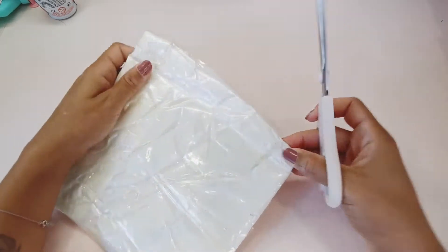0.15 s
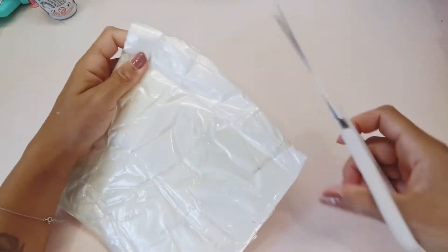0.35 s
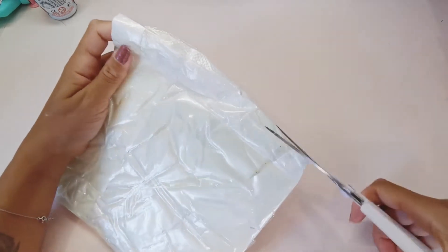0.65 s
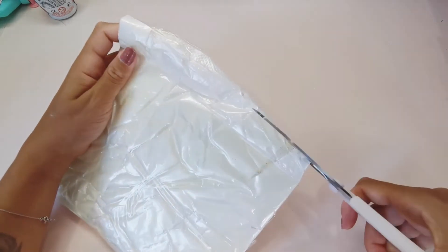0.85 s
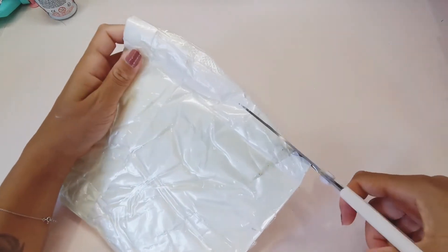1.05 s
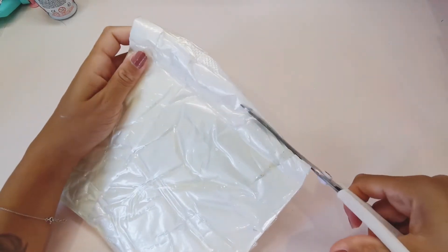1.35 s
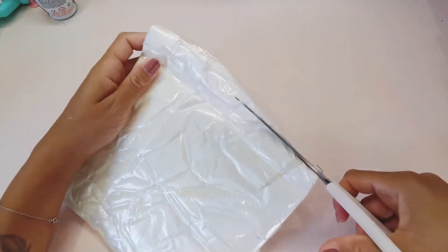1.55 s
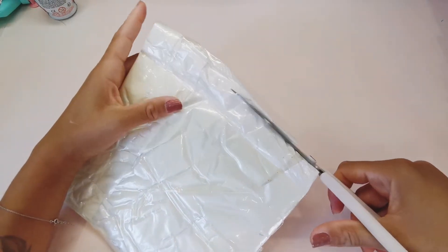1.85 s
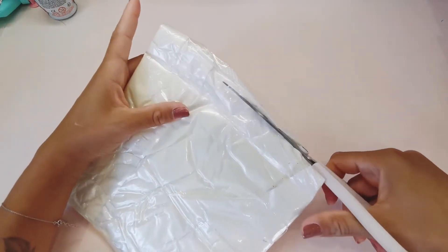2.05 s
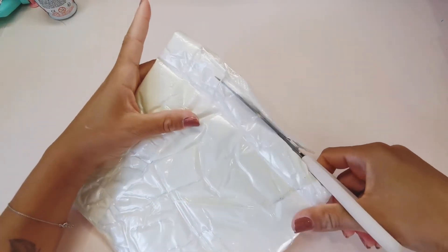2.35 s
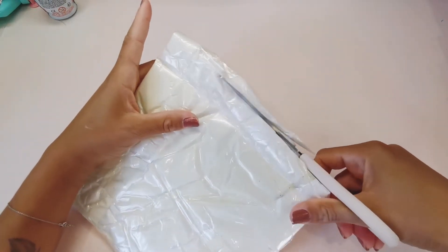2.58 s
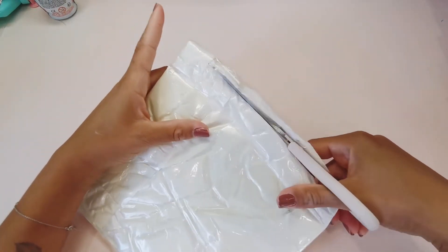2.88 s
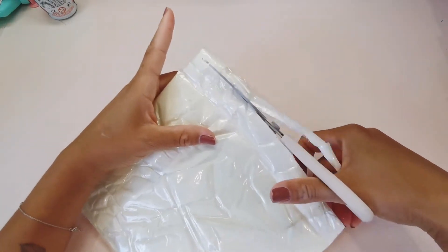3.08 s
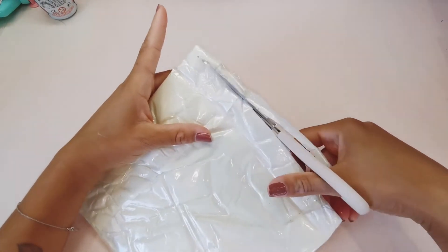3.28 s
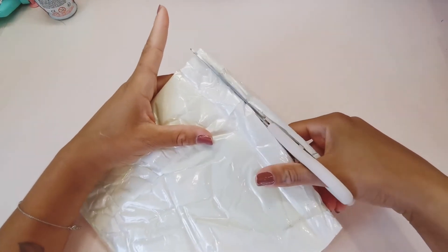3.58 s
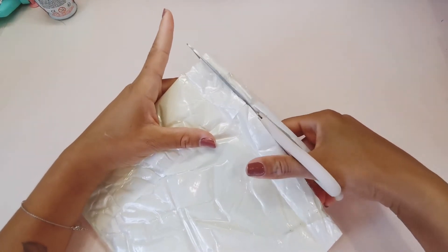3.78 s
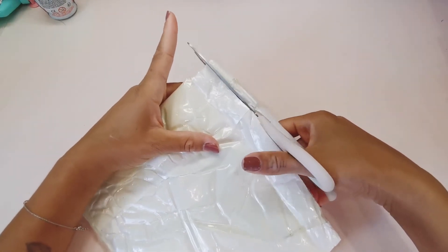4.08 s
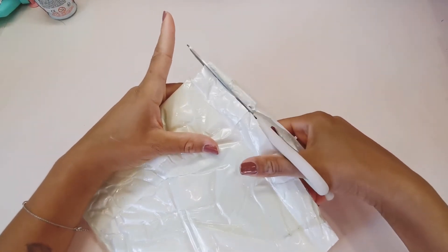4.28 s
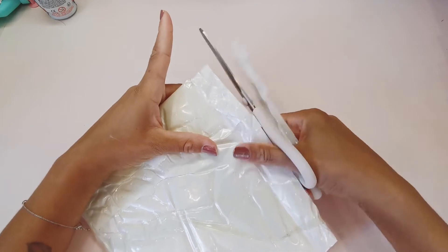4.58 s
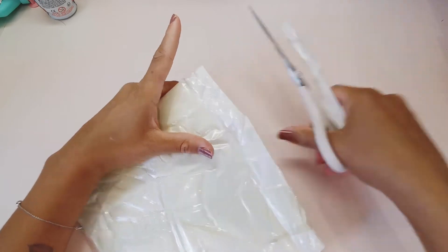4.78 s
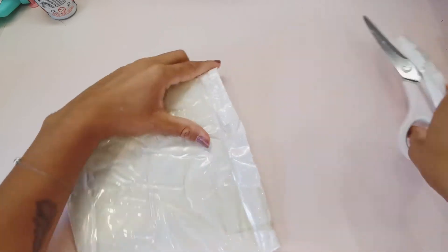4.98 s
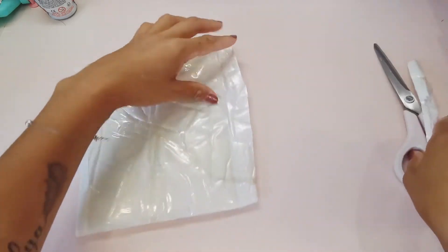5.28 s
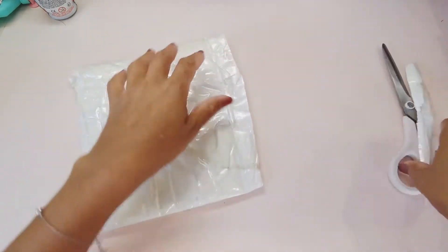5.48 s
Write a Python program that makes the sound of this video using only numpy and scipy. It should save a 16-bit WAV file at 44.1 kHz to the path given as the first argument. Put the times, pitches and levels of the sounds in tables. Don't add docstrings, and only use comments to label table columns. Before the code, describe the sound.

A stiff plastic pouch is handled and cut with scissors at close range, slightly louder on the left. Crisp crease snaps and fine crackle ride on breathy swells of rustling film, with a hollow papery boom beneath. After the sharpest snip comes a shifting slide, then a woody double knock as the handles land, over faint room murmur.

```python
import sys
import numpy as np
from scipy import signal
from scipy.fft import rfft, irfft
from scipy.io import wavfile
from scipy.ndimage import uniform_filter1d

SR = 44100
rng = np.random.default_rng(int(sys.argv[2]) if len(sys.argv) > 2 else 0)


def to_wav(sig):
    pcm = np.clip(np.atleast_2d(sig), -1, 1) * 32767
    pcm = np.round(pcm).astype(np.int16)
    wavfile.write(sys.argv[1], SR, pcm.T)


def magnitude_from_level(level_db):
    exponent = np.asarray(level_db, float) / 20
    return 10 ** exponent


N = 248724

# pitch in Hz, level in dB per Hz.
ROOM_SPECTRUM = [(15, -35), (25, 5), (53, -7), (72, -5), (145, -11), (236, -24.5), (309, -13.5),
                 (451, -20.5), (591, -29), (641, -23.5), (1290, -34), (1400, -25), (16000, -58)]
ROOM_DB = -61.5
# pitch in Hz, likeness from 0 to 1.
LIKENESS = [(60, 0.91), (180, 0.82), (550, 0.68), (1650, 0.08), (4970, 0.24), (15000, 0.38)]
# pitch in Hz, difference in dB.
LEFT_RIGHT = [(60, -34), (180, -1.5), (550, 4), (1650, 4), (4970, 1.5), (15000, 6.5)]

# start in seconds, peak in dB, pitch in Hz, 60 dB decay in seconds.
BUMPS = [(0.028, -54, 217.5, 0.1), (0.057, -52.5, 92.5, 0.085), (0.086, -55, 45.8, 0.051),
         (0.147, -63, 75.4, 0.12), (0.758, -58, 140, 0.065), (1.197, -58, 189, 0.032),
         (1.601, -57, 158, 0.069), (2.138, -59, 117, 0.036), (2.528, -51, 136, 0.07),
         (2.568, -49.5, 193, 0.042), (2.748, -62.5, 203, 0.19), (3.15, -62, 220, 0.032),
         (4.289, -50.5, 70, 0.14), (4.447, -58, 50, 0.14), (4.611, -52.5, 72, 0.15),
         (4.824, -56.5, 47, 0.14), (4.86, -57, 125, 0.059), (4.976, -62, 108, 0.11),
         (5.298, -46, 70, 0.044), (5.313, -41.5, 70, 0.044), (5.36, -51, 62, 0.1),
         (5.538, -57.5, 168, 0.08)]
# start in seconds, peak in dB.
KNOCKS = [
    (5.289, -24.5),
    (5.297, -49),
    (5.317, -37.5),
    (5.331, -30),
    (5.359, -47),
]
# pitch in Hz, level in dB, 60 dB decay in seconds.
WOOD_RINGS = [(386, -2, 0.055), (500, -5.5, 0.033), (861, 0.5, 0.016), (2180, -32, 0.024)]

# pitch in Hz, level in dB, 60 dB decay in seconds.
STEEL_RINGS = [(1632, 3.5, 0.014), (3940, -6, .02), (5010, -1.5, 0.027), (5700, -5.5, .03),
               (6710, -4.5, 0.026), (8700, -17, 0.009)]
# start in seconds, peak in dB, extra dB of the lowest ring.
CLINKS = [(4.6305, -29, -12), (4.6443, -22.5, -1.5), (4.6462, -28.5, 0), (4.3712, -31.5, -12),
          (4.9945, -43.5, 17), (5.289, -35.5, -5), (5.3138, -37, -17), (5.3275, -35, -24),
          (5.3562, -44, -22), (5.372, -46, -20), (5.533, -42, -31)]

# pitch in Hz, level in dB per Hz.
FILM_SPECTRUM = [(880, -26.5), (1500, -2), (2220, 2.5), (2470, 3.5), (3250, 1), (5210, 1), (7630, -2),
                 (9100, 1), (13000, -4), (15600, -10.5)]
# pitch in Hz, width in Hz, level in dB.
BLADE_RINGS = [(2260, 470, -18), (5180, 310, -1), (6790, 560, 2), (8300, 200, -18), (10760, 130, 0)]
# pitch in Hz, width in Hz, level in dB.
POUCH_BOOMS = [(370, 75, -9.5), (610, 91, -13.5), (777.6, 46, -2.5), (940, 290, -10.5)]
# pitch in Hz, width in Hz.
BLADE_RUB = (1544, 1140)

# peak in seconds, rise in seconds, fall in seconds, rustle in dB, pouch boom in dB against it.
SLICES = [(1.391, 0.095, 0.12, -46, -10), (1.808, 0.15, 0.089, -49.5, -7), (2.19, 0.073, 0.089, -48, -6.5),
          (2.341, 0.011, 0.22, -55, -17), (2.419, 0.13, 0.056, -52.5, -3), (2.542, 0.043, 0.16, -46, -3.5),
          (2.768, 0.14, 0.078, -46.5, -6), (3.072, 0.036, 0.053, -47.5, -13),
          (3.15, 0.14, 0.042, -49.5, -12.5), (3.451, 0.069, .2, -52.5, -11),
          (3.591, 0.08, 0.11, -51.5, -4.5), (3.809, 0.11, 0.062, -53, -0.5), (4.149, 0.088, 0.094, -51, -4),
          (4.358, 0.18, 0.033, -53, -8.5), (4.64, 0.041, 0.11, -44, -8.5)]
PUSHES = [(1.539, 0.049, 0.41, -56, -11.5), (1.64, 0.05, 0.086, -52, 0.5), (1.72, 0.028, 0.087, -51.5, -10),
          (1.972, 0.04, 0.53, -55, -4.5), (2.7, 0.084, 0.12, -50, -5.5), (2.943, 0.12, 0.086, -48.5, -7.5),
          (3.298, 0.18, 0.096, -52, -5.5), (3.751, 0.043, .12, -56, -17),
          (3.911, 0.057, 0.15, -49.5, -16.5), (4.52, 0.097, 0.23, -57, -12)]
GRIPS = [(.05, 0.089, 0.27, -58, -8.5), (0.183, 0.059, 0.23, -48.5, -2), (.43, 0.031, 0.12, -56.5, -14),
         (.64, 0.53, 0.14, -68.5, 3), (.78, 0.13, 0.037, -63.5, 5), (1.06, 0.17, 0.56, -66.5, -14),
         (1.21, 0.12, 0.18, -60.5, -1.5), (4.799, 0.076, 0.26, -51, -0.5), (4.868, 0.15, 0.075, -52, 12.5),
         (0.332, 0.053, 0.11, -52, 1)]
SLIDES = [
    (4.93, 0.072, 0.93, -56, -25),
    (5.2, 1, 0.073, -57, -16),
    (5.279, 0.046, 0.11, -50.5, -7),
    (5.358, 0.093, 0.11, -60, -22),
    (5.53, 0.029, 0.054, -71, -17.5),
]
BRIGHT_DB = [0.047, -1.5, -2.6, -1.5, -0.61]
RUB_DB = [-4.5, -3, -42, -2]
BOOM_DB = [-8, 3.5]
REST_DB = -81
RISE_BULGE, FALL_BULGE = 0.85, 0.92

# start in seconds, peak in dB, ring in dB against the snap, brightness in dB.
CUSHION_SNAPS = [(.262, -29.5, -7.5, -10), (0.3051, -27, -10, 0), (.4209, -39, -16, 8),
                 (1.002, -32.5, -24, -13), (1.0784, -31.5, -19, -8.5), (1.1963, -25, -7.5, -9),
                 (1.237, -43.5, -21, -24), (1.3787, -26, -26, 0), (1.4444, -31.5, -16.5, -23),
                 (1.6707, -30.5, -23, -2), (1.706, -46, 1, -20.5), (1.8192, -34.5, -20, -1),
                 (1.9627, -35, -13, -3), (2.1786, -52, -19, 22), (2.2006, -30, -8, 2), (2.328, -47, -3, 13),
                 (2.4192, -36.5, -10, 7.5), (2.5235, -34.5, 0.5, 5.5), (2.5453, -27.5, -18, -1.5),
                 (2.6279, -24.5, -14.5, -8), (2.7734, -41, -9, -6), (3.2103, -47, -28, 11.5),
                 (3.281, -26.5, -15.5, -2.5), (3.3216, -25, -23.5, -28), (3.8666, -34.5, -18.5, -4),
                 (3.9267, -27.5, -23.5, -22), (4.0796, -50.5, -3, 6), (4.2937, -34, -15, -3),
                 (4.7789, -40, -3, -14), (4.8135, -40, -7.5, -8)]
LONG_SNAPS = [(.623, -45.5, -12.5, 0), (0.8017, -51, -15, 3), (1.131, -36, -24, -28),
              (1.2185, -35, -29, -12), (1.551, -36.5, -12, -20), (1.7874, -24, -23, -5.5),
              (2.8855, -47.5, -6, 7), (2.9307, -26.5, -19, -1), (2.95, -31, -3, -2),
              (3.02, -27.5, -17.5, 0), (3.0787, -27, -19, -3.5), (3.1533, -39.5, -10.5, -17),
              (2.679, -41.5, -3.5, -8), (4.6448, -33.5, -6.5, 7), (5.2875, -27, -25, -7),
              (5.3132, -29, -21, -13)]
MIDDLE_SNAPS = [(0.0643, -32, -25, -10), (.0907, -31.5, -23, -10), (0.1465, -46, -8, -13),
                (.167, -34, -3, -6), (.187, -25, -32, -19), (.216, -40, -18, -28), (.637, -52.5, -30, 17),
                (.7183, -60, 1, -13), (.7457, -57, -3, -13), (0.7632, -42, -3.5, 6), (1.3392, -31, -27, -8),
                (2.1506, -49, -21, -27), (3.5398, -36, -16, 6), (3.5676, -32, -15.5, 8.5),
                (3.738, -51.5, -22, 12.5), (4.133, -26.5, -14.5, -7), (.277, -27.5, -37, -25),
                (4.994, -29, -11, -3.5), (5.014, -40.5, -2.5, -3), (5.0575, -45, -6, -10),
                (4.4832, -55, -24, 15)]
SHORT_SNAPS = [(0.0309, -34, -18, -6), (0.2297, -28, -18, -1), (0.388, -32, -18, -2),
               (0.5524, -50.5, 2.5, -20), (1.302, -33.5, -25, -5.5), (1.318, -33.5, -27, -5),
               (1.5273, -43.5, -24, 4), (1.6089, -31, -10.5, 2), (2.7027, -43, -19, 11),
               (2.7402, -28, -12.5, -7), (2.799, -27.5, -17, -22), (3.053, -44, -6, 5),
               (3.1317, -26, -14.5, 0), (3.4423, -39.5, -13, 8), (3.607, -31, -21, -3),
               (3.727, -49, -12, 6), (3.893, -32, -21, -9), (4.2722, -50, -3, -8), (4.345, -32, -15, 7),
               (4.37, -34, -13.5, 1.5), (4.631, -30, -12, 3), (4.8313, -38.5, -6, 5.5),
               (5.523, -40, -24, -3)]
TIGHT_SNAPS = [(.858, -50, -25, -27), (0.891, -46, -21, -22), (1.26, -45, -25, 0.5), (1.46, -38, -9, -17),
               (2.4797, -38.5, -25, -8), (3.631, -36.5, -10.5, 1), (3.653, -44, -4.5, 6),
               (4.4514, -58, -28, 9.5), (4.6455, -30, -26, 6), (4.6464, -25, -14, 2),
               (4.932, -33, -23, -12), (5.143, -45.5, -3, 7), (5.329, -48, -15, -14), (5.533, -40, -25, -9)]
SLACK_SNAPS = [(.0405, -41, -20, -9), (.099, -42.5, -8, -15), (.12, -41, -22, -8),
               (.1805, -33.5, -0.5, -12), (2.591, -41, -1, -10), (2.615, -40, -8, -14),
               (2.944, -32, -14, 0), (2.984, -41, -7.5, -12), (5.049, -45.5, -7.5, -10)]
# pitch in Hz, 60 dB decay in seconds.
FOLD_RINGS = [
    (772, 0.11),
    (598, 0.095),
    (955, 0.13),
    (1570, 0.13),
    (1580, 0.037),
    (860, 0.047),
]
# time of the peak in seconds, peak in dB, pitch in Hz.
EARLY_POPS = [(0.0393, -30, 3000), (0.0646, -27, 4140), (0.0908, -25.5, 3780), (0.1482, -26, 4000),
              (0.168, -21.5, 1600), (0.1923, -16, 3600), (0.2326, -19.5, 2700), (0.2631, -21, 1300),
              (0.2775, -16.5, 2230), (0.3073, -14, 4700), (0.3201, -26, 4800), (0.3887, -19, 6030),
              (0.4212, -15, 7800), (0.4343, -26, 5900), (0.5529, -30, 1670), (0.6383, -28, 8400),
              (0.7636, -23, 7300), (0.8031, -32.5, 6400), (1.0037, -28, 3500), (1.08, -28, 4400),
              (1.132, -31, 2920), (1.1977, -13.5, 1940), (1.2192, -28, 2700), (1.2391, -27.5, 3900),
              (1.2612, -30, 7100), (1.3037, -25, 3680), (1.3193, -31, 5600), (1.3534, -27, 4300),
              (1.387, -17, 3800), (1.4174, -23, 5600), (1.4451, -23, 2400), (1.5396, -29, 3400),
              (1.553, -27, 3800), (1.6094, -18, 3000), (1.6442, -25, 3400), (1.67, -27, 6900),
              (1.7294, -24, 6800), (1.7877, -17, 4400), (1.8235, -19.5, 5700), (1.8463, -28, 3700),
              (1.9637, -26, 3800), (1.9849, -26, 5600), (1.989, -26, 6900), (2.0789, -31.5, 6300),
              (2.1569, -31, 8000), (2.1665, -27, 7130), (2.1835, -23, 7100), (2.1866, -23, 8200),
              (2.2023, -18, 3600), (2.3296, -33, 8500), (2.4032, -35, 5250), (2.4223, -25, 4570),
              (2.5475, -15, 5100)]
LATE_POPS = [(2.6136, -28, 2300), (2.6295, -13, 3180), (2.7023, -24, 4700), (2.7178, -25, 5800),
             (2.7414, -16, 3430), (2.801, -23, 3000), (2.9309, -16.5, 4400), (2.9504, -21, 2800),
             (2.9839, -27.5, 2000), (3.0214, -15, 6000), (3.0539, -24, 7200), (3.0789, -18, 6000),
             (3.1068, -26, 5900), (3.1331, -16.5, 4470), (3.1551, -25, 2590), (3.2117, -18.5, 7500),
             (3.2829, -25, 5200), (3.2971, -27, 5000), (3.3222, -21, 3100), (3.3289, -25, 3200),
             (3.4443, -36, 6300), (3.4792, -28, 6700), (3.5405, -14.5, 8700), (3.5694, -20, 9000),
             (3.632, -32, 4100), (3.6524, -30, 4500), (3.7395, -27, 7000), (3.7553, -34, 6000),
             (3.7628, -29, 5400), (3.8677, -23, 6400), (3.8913, -25, 3300), (3.9527, -26.5, 3200),
             (4.1193, -28, 5500), (4.1334, -16.5, 7600), (4.297, -25, 4600), (4.3131, -25, 5800),
             (4.3475, -16.5, 6600), (4.3713, -15.5, 5540), (4.4517, -34, 5800), (4.4846, -37, 6800),
             (4.6312, -21, 5500), (4.6466, -9, 3870), (4.6984, -26, 5260), (4.7909, -28, 2600),
             (4.8152, -24, 4100), (4.9322, -30, 4400), (4.9947, -26, 1720), (4.9987, -17.5, 3400),
             (5.1405, -30, 4400), (5.1567, -31.5, 2390), (5.2663, -30, 3400), (5.288, -17, 5700),
             (5.3142, -21, 4370), (5.328, -25, 5500), (5.3556, -27, 5800), (5.5235, -31, 3700),
             (5.5334, -26, 5800)]


def evened(x):
    return x / np.sqrt(np.mean(x ** 2) + 1e-20)


def read(points, hz):
    f, value = np.transpose(points)
    return np.interp(np.log(hz + 1), np.log(f + 1), value)


def add(mix, s, sound):
    part = mix[max(round(s * SR), 0):][:len(sound)]
    part += sound[:len(part)]


def resonate(x, hz, width):
    r = np.exp(-np.pi * width / SR)
    return 2 * signal.lfilter([1 - r], [1, -r * np.exp(2j * np.pi * hz / SR)], x).real


def coloured(x, db):
    both_sides = np.r_[db, db[-2:0:-1]]
    log_gain = np.log(magnitude_from_level(np.maximum(both_sides, -100)))
    taps = np.fft.ifft(np.exp(np.conj(signal.hilbert(log_gain)))).real
    return signal.oaconvolve(x, taps[:1024])[:len(x)]


def split(x, hz):
    low = signal.butter(3, hz, fs=SR, output="sos")
    high = signal.butter(3, hz, "high", fs=SR, output="sos")
    return signal.sosfilt(low, x), signal.sosfilt(high, x)


def room_tone():
    frames, hz = N // 512 + 5, np.fft.rfftfreq(2048, 1 / SR)
    a, b, c, d, patches = rng.standard_normal((frames, 1025, 5)).T
    patches = uniform_filter1d(patches, 20, 0)
    patches = evened(uniform_filter1d(patches, 8, 1))
    same = read(LIKENESS, hz)[:, None]
    left = a + 1j * b
    right = same * left + np.sqrt(1 - same ** 2) * (c + 1j * d)
    spectrum = np.array([left, right]) * magnitude_from_level(read(ROOM_SPECTRUM, hz)[:, None] + 1.3 * patches)
    murmur = signal.istft(spectrum, nperseg=2048, noverlap=1536)[1][:, :N]
    return magnitude_from_level(ROOM_DB) * evened(murmur)


def reflections(x, t60, start_s):
    t = np.arange(round(t60 * SR)) / SR
    signs = rng.choice([-1., 1.], (2, len(t)))
    taps = signs * (rng.random((2, len(t))) < 5000 / SR) * (t > start_s)
    low, high = split(taps, 2060)
    taps = 0.5 * low * magnitude_from_level(-60 * t / (1.12 * t60)) + high * magnitude_from_level(-60 * t / t60)
    return signal.oaconvolve(x[None], taps / np.linalg.norm(taps[0]), axes=1)[:, :N]


def table():
    t, out = np.arange(9000) / SR, np.zeros(N)
    soft_start = 1 - np.exp(-t / 0.00067)
    for s, db, hz, t60 in BUMPS:
        add(out, s, magnitude_from_level(db + 12.0 - 60 * t / t60) * soft_start * np.sin(2 * np.pi * hz * t))
    rise = 1 - np.exp(-t / 0.0009)
    detune = rng.uniform(0.9, 1.04, (len(KNOCKS), len(WOOD_RINGS)))
    for (s, db), shifts in zip(KNOCKS, detune):
        for (hz, ring_db, t60), shift in zip(WOOD_RINGS, shifts):
            wave = np.sin(2 * np.pi * hz * shift * t)
            add(out, s, magnitude_from_level(db + ring_db - 60 * t / t60) * rise * wave)
    return out


def clinks():
    t, out = np.arange(3000) / SR, np.zeros(N)
    rise = np.minimum(t / 0.00039, 1)
    for s, db, low_db in CLINKS:
        for hz, ring_db, t60 in STEEL_RINGS:
            level_db = db + ring_db + low_db * (hz < 2500) - 60 * t / t60
            add(out, s, magnitude_from_level(level_db) * rise * np.sin(2 * np.pi * hz * t))
    return out


def strokes(power=0.56):
    t = np.arange(0, N + 64, 32) / SR
    rows = [(*r, RUB_DB[0], BRIGHT_DB[0]) for r in SLICES]
    rows += [(*r, RUB_DB[1], BRIGHT_DB[1]) for r in PUSHES]
    rows += [(*r[:4], BOOM_DB[0], r[4], BRIGHT_DB[2]) for r in GRIPS]
    rows += [(*r, RUB_DB[3], BRIGHT_DB[4]) for r in SLIDES]
    s, rise, fall, db, *colours = np.transpose(rows)[:, :, None]
    swell = (1 + (t - s) / rise).clip(0) ** RISE_BULGE
    sink = (1 - (t - s) / fall).clip(0) ** FALL_BULGE
    rest = magnitude_from_level(power * REST_DB)
    gains = (rest + np.minimum(swell, sink) * (magnitude_from_level(power * db) - rest)) ** (1 / power)
    share, still = (gains - magnitude_from_level(REST_DB)) ** 2, magnitude_from_level(REST_DB) ** 2
    at_rest = BOOM_DB[1], RUB_DB[2], BRIGHT_DB[3]
    mixed = [((share * c).sum(0) + still * r) / (share.sum(0) + still) for c, r in zip(colours, at_rest)]
    return [gains.max(0), *mixed], t


def stroke(column):
    rows, t = strokes()
    return np.interp(np.arange(N) / SR, t, rows[column - 1])


def effort():
    return stroke(column=1)


def film(x, ring_db=-2):
    x = coloured(x, read(FILM_SPECTRUM, np.fft.rfftfreq(2048, 1 / SR)))
    rings = sum(magnitude_from_level(db) * resonate(x, hz, width) for hz, width, db in BLADE_RINGS)
    return x + magnitude_from_level(ring_db) * rings


def pops(rise_cycles=0.26, fall_cycles=0.33):
    t, out = np.arange(-64, 192) / SR, np.zeros(N)
    for s, db, hz in list(EARLY_POPS) + list(LATE_POPS):
        turns = hz * t
        before = np.exp(-(turns / rise_cycles) ** 2)
        after = np.exp(-abs(turns) / fall_cycles)
        shape = np.where(t < 0, before, after)
        add(out, s + t[0], -magnitude_from_level(db) * shape * np.cos(2 * np.pi * turns))
    return out


def ticks(per_s, spread_db, count):
    size = magnitude_from_level(spread_db * np.minimum(rng.exponential(1, N), 4)) * (rng.random(N) < per_s / SR)
    kind, t, out = rng.integers(0, count, N), np.arange(300) / SR, np.zeros(N)
    for k, hz in enumerate(np.geomspace(750, 13000, count)):
        grain = np.sin(2 * np.pi * hz * t) * np.exp(-t * (1.3 * hz + 500))
        out += signal.oaconvolve(size * (kind == k), evened(grain) * (hz / 4000) ** 0.04)[:N]
    return effort() * evened(out)


def snaps():
    t = np.arange(3000) / SR
    dull, bright, boom = np.zeros((3, N))
    tables = CUSHION_SNAPS, LONG_SNAPS, MIDDLE_SNAPS, SHORT_SNAPS, TIGHT_SNAPS, SLACK_SNAPS
    flips = [(*row, *fold) for rows, fold in zip(tables, FOLD_RINGS) for row in rows]
    chance = rng.standard_normal((len(flips), 2, len(t)))
    for (s, db, boom_db, bright_db, hz, t60), (noise, lumps) in zip(flips, chance):
        shape = np.minimum(t / 0.0001, 1) * magnitude_from_level(-60 * t / t60)
        lumpy = magnitude_from_level(4 * evened(uniform_filter1d(lumps, 24)))
        burst = noise * shape * (lumpy + 3.5 * magnitude_from_level(-60 * t / 0.015))
        burst = burst / np.sqrt(abs(uniform_filter1d(burst ** 2, 60)).max())
        add(dull, s, magnitude_from_level(db) * burst)
        add(bright, s, magnitude_from_level(db + bright_db) * burst)
        push = burst * magnitude_from_level(-60 * t / 0.13)
        ring = resonate(resonate(push, hz, 0.3 * hz), hz, 1.8 * hz)
        add(boom, s, magnitude_from_level(db + boom_db) * ring / abs(ring).max())
    low, high = (np.std(part) for part in split(film(rng.standard_normal(N)), 8000))
    body = split(film(dull), 4700)[0]
    top = split(film(bright), 4700)[1]
    return magnitude_from_level(-6.5) * body / low + magnitude_from_level(-8.5) * top / high + magnitude_from_level(8.5) * boom


def crackle(per_s, spread_db, t60):
    size = magnitude_from_level(spread_db * np.minimum(rng.exponential(1, N), 3)) * (rng.random(N) < per_s / SR)
    fall = magnitude_from_level(-60 / t60 / SR)
    return evened(np.sqrt(signal.lfilter([1], [1, -fall ** 2], size ** 2)))


def rustle(bursts):
    creases = bursts * rng.standard_normal(N)
    dull, bright = split(film(creases), 5840)
    hiss = evened(dull) + magnitude_from_level(stroke(column=4) + 1.0) * evened(bright)
    rub = evened(resonate(resonate(creases, *BLADE_RUB), *BLADE_RUB))
    boom = evened(sum(magnitude_from_level(db) * resonate(creases, hz, width) for hz, width, db in POUCH_BOOMS))
    return effort() * (hiss + magnitude_from_level(stroke(column=2) + 3.5) * boom + magnitude_from_level(stroke(column=3) - 0.5) * rub)


def spots(x, lag=5.06, lag_spread=2.4, fade_hz=5500, near_db=0.5):
    hop, size = 192, 1024
    starts = np.arange(0, N + hop, hop)
    padded = np.r_[np.zeros(hop), x, np.zeros(2 * hop)]
    window = np.sin(np.pi * np.arange(2 * hop) / (2 * hop))
    pieces = padded[starts[:, None] + np.arange(2 * hop)] * window
    hz, t = np.fft.rfftfreq(size, 1 / SR), np.arange(3 * hop) / SR
    taps = rng.standard_normal((len(starts), 2, len(t))) * (rng.random((len(starts), 2, len(t))) < 0.3)
    taps = taps * magnitude_from_level(-60 * t / 0.013) * (t > 0.0002)
    taps = taps / np.linalg.norm(taps, axis=2, keepdims=True)
    near = rfft(taps, size) * hz / np.hypot(hz, 1300)
    lags = lag + lag_spread * rng.standard_normal((len(starts), 1))
    late = np.exp(-2j * np.pi * hz * lags / SR * (hz < fade_hz))
    late = late * np.exp(-2j * np.pi * (hz - 7800).clip(0) * 0.66 * (lags - lag) / SR)
    paths = np.stack([late, np.ones_like(late)], axis=1) + magnitude_from_level(near_db) * near
    side = magnitude_from_level(read(LEFT_RIGHT, hz) / 2)
    heard = irfft(rfft(pieces, size)[:, None] * paths * np.array([side, 1 / side]), size)
    out = np.zeros((N + 3 * size, 2))
    for start, piece in zip(starts, heard):
        add(out, start / SR, piece.T)
    return out[hop:hop + N].T


def scene():
    bursts = 1.4 + crackle(450, 3.8, 0.014)
    plastic = magnitude_from_level(2.0) * rustle(bursts) + magnitude_from_level(-6.0) * ticks(420, 3.6, count=10) + snaps()
    plastic = plastic + magnitude_from_level(-2.5) * pops() + clinks()
    plastic = split(plastic, 230)[1]
    wood = table()
    far = magnitude_from_level(-15) * reflections(plastic, 0.15, 0.006)
    far = far + magnitude_from_level(-3) * split(reflections(wood, 0.2, 0.0016), 110)[1]
    wood_sides = wood * magnitude_from_level([[-0.6], [0.6]])
    return magnitude_from_level(-3.5) * spots(plastic) + far + wood_sides + room_tone()


def band_limit(x):
    return signal.sosfilt(signal.butter(12, 16990, fs=SR, output="sos"), x)


def record(dry):
    edge = signal.firwin(511, 15900, window=("kaiser", 7), fs=SR)
    mix = signal.oaconvolve(dry, edge[None], "same")
    return band_limit(mix)


dry = scene()
out = record(dry)
to_wav(out)
```